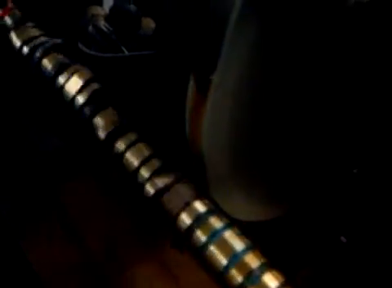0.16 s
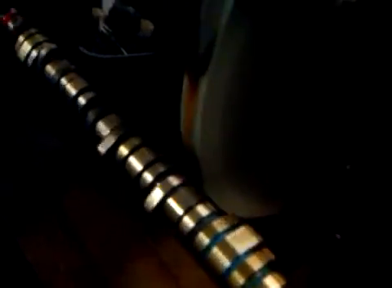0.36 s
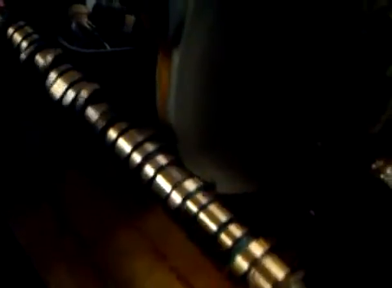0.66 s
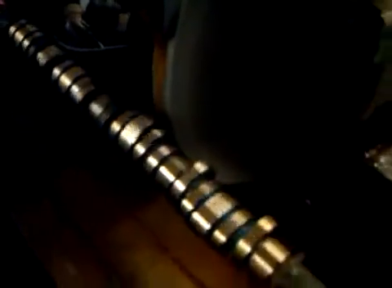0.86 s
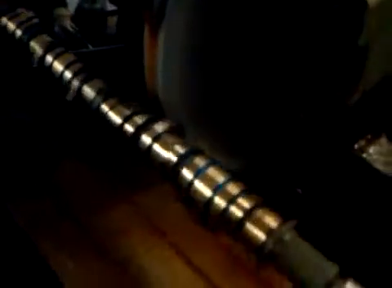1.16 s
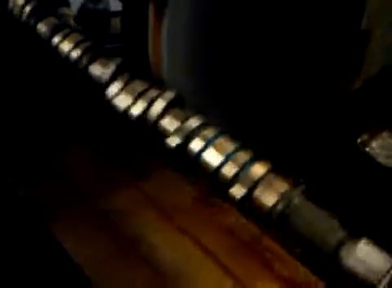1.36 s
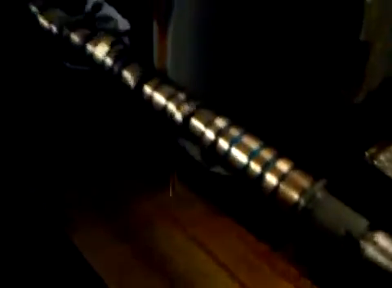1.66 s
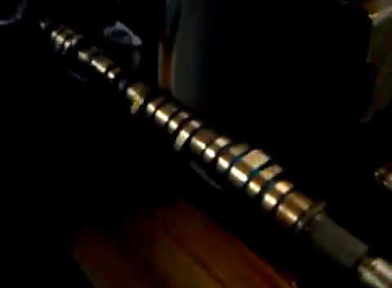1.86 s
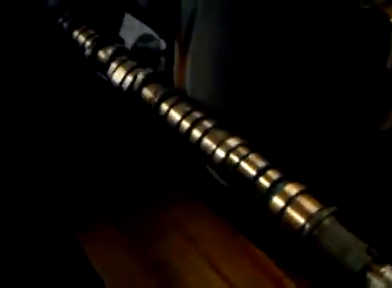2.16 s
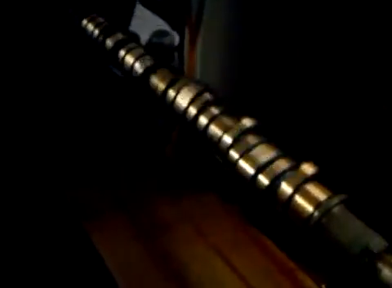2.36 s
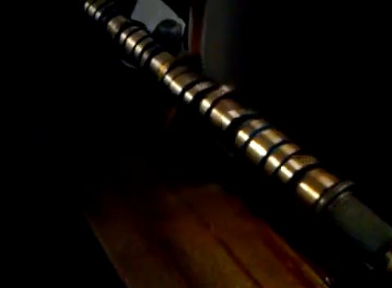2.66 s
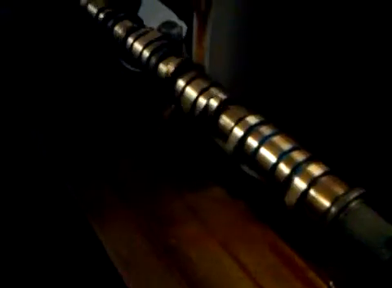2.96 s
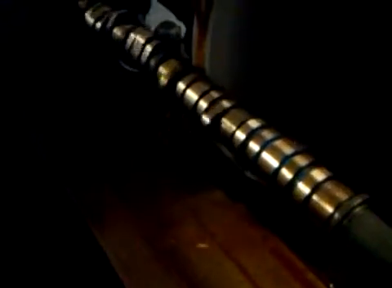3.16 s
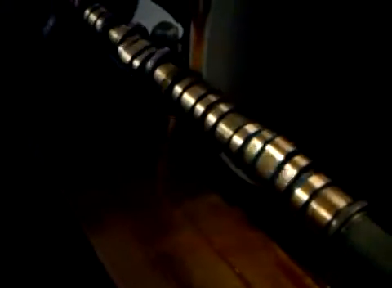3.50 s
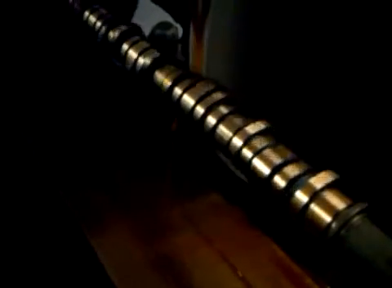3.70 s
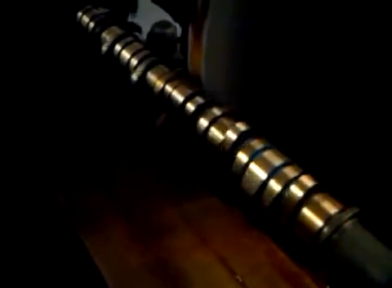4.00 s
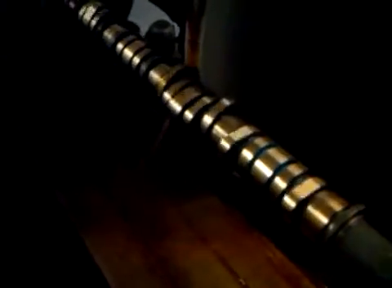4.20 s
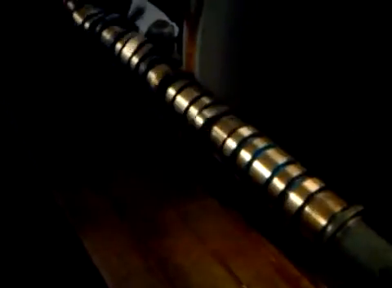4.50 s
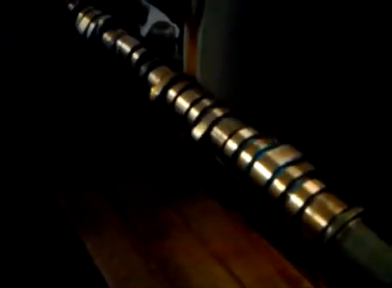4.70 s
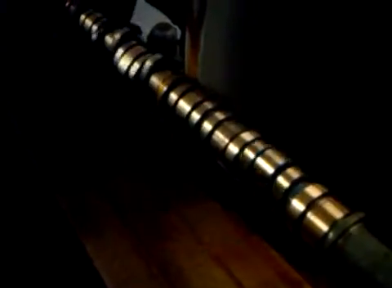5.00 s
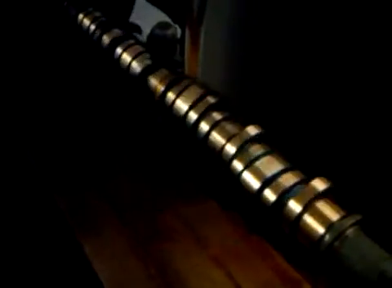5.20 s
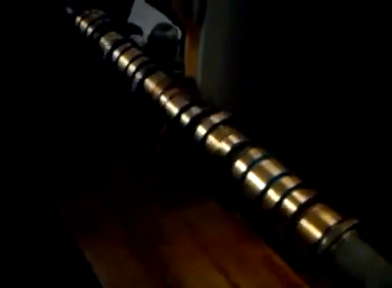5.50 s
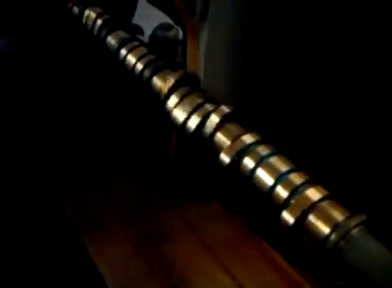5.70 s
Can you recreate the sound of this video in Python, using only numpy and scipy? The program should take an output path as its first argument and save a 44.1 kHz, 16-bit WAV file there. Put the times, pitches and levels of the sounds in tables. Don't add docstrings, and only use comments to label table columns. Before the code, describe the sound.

Machine-shop grinder idles with hum, gear whine and coolant hiss, then bites metal lobes in harsh buzzing bursts, one short, one long.

```python
import sys
import numpy as np
from scipy import signal
from scipy.fft import rfft, irfft, next_fast_len
from scipy.io import wavfile
from scipy.ndimage import uniform_filter1d, map_coordinates

SR = 44100
rng = np.random.default_rng(int(sys.argv[2]) if len(sys.argv) > 2 else 0)


def gain_from_decibels(decibels):
    exponent = np.asarray(decibels, float) / 20
    return 10 ** exponent


def bounce(signal):
    frames = np.transpose(np.atleast_2d(signal))
    limited = np.clip(frames, -1, 1)
    pcm = np.round(limited * 32767).astype(np.int16)
    wavfile.write(sys.argv[1], SR, pcm)


N = 257984
T = np.arange(N) / SR


def unit(x):
    return x / np.sqrt(np.mean(x ** 2) + 1e-20)


def along(points, hz):
    f, v = np.transpose(points)
    return np.interp(np.log(hz + 1), np.log(f + 1), v)


def curves(table):
    s, *cols = np.transpose(table)
    return [np.interp(T, s, c) for c in cols]


def wobble(rate_hz):
    coarse = T[::16]
    knots = rng.standard_normal(int(N * rate_hz / SR) + 4)
    return np.interp(T, coarse, map_coordinates(knots, [coarse * rate_hz]))


def filtered(x, response):
    m = next_fast_len(N + SR // 2)
    return irfft(rfft(x, m) * response(np.fft.rfftfreq(m, 1 / SR)), m)[:N]


def modes(table):
    def response(f):
        total = 0
        for k, (hz, width_hz, db) in enumerate(table):
            damping = 1j * f * width_hz
            total = total + (-1) ** k * gain_from_decibels(db) * damping / (hz * hz - f * f + damping)
        return total
    return response


def smooth_field(shape, bins, frames):
    return unit(uniform_filter1d(uniform_filter1d(rng.standard_normal(shape), bins, 0), frames, 1))


def rush(spectrum, patchy_db):
    z = signal.stft(rng.standard_normal(N), nperseg=512)[2]
    patches = gain_from_decibels(patchy_db * smooth_field(z.shape, 6, 12))
    x = signal.istft(z * patches, nperseg=512)[1][:N]
    return unit(filtered(x, lambda hz: gain_from_decibels(along(spectrum, hz))))


def tone(hz, db, wander_db):
    phase = 2 * np.pi * hz * T + 6 * rng.random() + .3 * wobble(5)
    return gain_from_decibels(db + 3 + wander_db * wobble(6)) * np.sin(phase)


def bursts(rows, attack_s):
    out, t = np.zeros(N + SR), T[:SR // 3]
    for s, db, t60 in rows:
        shape = gain_from_decibels(db - 60 * t / t60) * (1 - np.exp(-t / attack_s))
        out[round(s * SR):][:len(t)] += shape * rng.standard_normal(len(t))
    return out[:N]


# (time [s], 64th wheel order [Hz])
WHEEL_SPEED = [(1.95, 1525), (2.35, 1524), (4.6, 1522), (5.166, 1517), (5.3, 1519)]
# (order [per turn], level [dB])
GRIT_ORDERS = [(30, 12), (34, 7.5), (37, 6.5), (40, 14), (42, 1.5), (48, 9.5), (52, 9), (54, 0), (60, -25),
               (62, 5), (64, 13)]
# (order [per turn], depth [dB], phase [turns])
WHEEL_RUNOUT = [(2, .4, .6), (4, .6, .1), (5, .6, .7), (6, .6, .4), (10, .6, .2)]
# (time [s], depth [dB], phase [turns])
TURN_BEAT = [(1.85, 3.5, 0), (2.45, 3.5, 0), (4.3, 1.5, .38), (5.85, 1.3, .38)]
# (frequency [Hz], density [dB per Hz])
RING_SPECTRUM = [(560, -46), (640, -13), (720, -9.5), (850, -2.5), (1000, -6), (1190, -8), (1280, 3.5),
                 (1340, -4), (1430, 1.5), (1540, -4), (1580, -27.5), (1750, -31.5)]
# (frequency [Hz], density [dB per Hz])
RASP_SPECTRUM = [(2380, -32.5), (4050, -16), (4240, -2), (4610, -9), (4920, -1.5), (6290, -3), (7250, -3),
                 (9420, -32.5), (16000, -120)]
# (frequency [Hz], density [dB per Hz])
SCRAPE_SPECTRUM = [(970, -45), (1650, -12.5), (1770, -18.5), (1900, -2), (2190, 0.5), (2450, -1),
                   (2790, -3.5), (3890, -0.5), (3950, -4.5), (5140, -45), (8690, -120)]
FULL_DB = -38
RING_DB, SCRAPE_DB = -6, -14.5
RING_GROWS, SCRAPE_GROWS = 0.73, 0.49


def grinding():
    press, flying = contact()
    order64_hz = uniform_filter1d(curves(WHEEL_SPEED)[0], SR // 8)
    turns = np.cumsum(order64_hz / 64 / SR)
    tracks = np.array([wobble(4.5) for _ in range(4)])
    drifting = sum(share * grit(turns) for share in tracks / np.linalg.norm(tracks, axis=0))
    steady = grit(turns, GRIT_ORDERS)
    chips = rng.standard_normal((2, N))
    runout_db = sum(db * np.cos(2 * np.pi * (order * turns + phase)) for order, db, phase in WHEEL_RUNOUT)
    depth_db, phase = curves(TURN_BEAT)
    beat_db = depth_db * np.cos(2 * np.pi * (turns + phase))

    shaking = .7 * steady + .5 * drifting + .55 * chips[0]
    ring = through_guard(shaking, RING_SPECTRUM, base=0.69, peaky=0.89, uneven_db=2.0)
    cutting = .45 * steady + .8 * drifting + .6 * chips[1]
    cutting = cutting * gain_from_decibels(1.1 * wobble(500))
    rasp = through_guard(cutting, RASP_SPECTRUM, base=0.41, peaky=0.81, uneven_db=3.0)
    scrape = through_guard(cutting, SCRAPE_SPECTRUM, base=0.17, peaky=0.96, uneven_db=7.0)

    bright = (press + flying) * rasp + gain_from_decibels(SCRAPE_DB) * press ** SCRAPE_GROWS * scrape
    bright = bright * gain_from_decibels(.8 * runout_db + .25 * beat_db + .6 * wobble(12))
    ring_db = RING_DB + .5 * runout_db + beat_db + 0.79 * wobble(13)
    return gain_from_decibels(FULL_DB) * (bright + press ** RING_GROWS * ring * gain_from_decibels(ring_db))


# (touch [s], ease [s], leave [s], first-bite share of pressure, build-up [s])
LOBE_PASSES = [
    (1.858, 2.332, 2.455, 0.31, 0.21),
    (4.351, 4.39, 4.41, 0.29, 0.19),
    (4.407, 5.325, 5.372, 0.066, 0.084),
    (5.765, 5.95, 9.6, .05, 0.048),
]
TOUCH_S, EASE_BEND = 0.0088, 0.78
CHIPS_DB, CHIPS_S, CHIPS_FADE_DB = -15, 0.065, -1.5


def contact():
    touch, ease, leave, bite, build = np.transpose(LOBE_PASSES)[..., None]
    ramp = lambda s, length_s: np.clip(s / length_s, 0, 1)
    press = ramp(T - touch, TOUCH_S) * (1 - (1 - bite) * np.exp(-np.abs(T - touch) / build))
    lift = ramp(T - ease, leave - ease)
    chips = gain_from_decibels(CHIPS_DB + CHIPS_FADE_DB * ramp(T - leave, CHIPS_S))
    chips = chips * lift * ramp(leave + CHIPS_S - T, TOUCH_S)
    return np.max(press * (1 - lift ** EASE_BEND), 0), np.sum(press * chips, 0)


def grit(turns, strong=(), size=4096):
    top_order = 340
    gain = np.ones(size // 2 + 1)
    for order, db in strong:
        gain[round(order)] = gain_from_decibels(db)
    gain[top_order:] = 0
    face = irfft(gain * np.exp(2j * np.pi * rng.random(len(gain))), size)
    face = face * size / np.sqrt(2 * top_order)
    return map_coordinates(face, [turns % 1 * size], mode="grid-wrap")


# (time [s], place [0 near end, 1 flank, 2 nose])
CONTACT_PLACE = [(2.5, 0), (4.3, 1), (4.7, 1), (4.95, 2), (5.5, 2), (5.7, 1)]
# (frequency [Hz], width [Hz], level [dB])
NEAR_END_MODES = [(930, 30, -2), (1290, 44, 0.5), (1506, 39, 1.5), (1910, 100, -12.5), (2105, 49, -16),
                  (2280, 37, -18), (3860, 150, -24), (4460, 92, -16), (5180, 110, -10), (5600, 58, 4.5),
                  (5680, 160, -4), (6240, 90, 0), (6460, 70, 0.5), (6740, 43, -1.5)]
# (frequency [Hz], width [Hz], level [dB])
FLANK_MODES = [(960, 45, -3), (1260, 38, -8.5), (1520, 33, -25), (2240, 120, -9), (3290, 150, -19.5),
               (3900, 160, -12), (4340, 38, -2.5), (4910, 54, -3), (5300, 41, -4.5), (5610, 54, -4),
               (6000, 110, 1.5), (6300, 59, 3.5), (6710, 36, 2.5), (6700, 42, -18)]
# (frequency [Hz], width [Hz], level [dB])
NOSE_MODES = [(972, 30, 4.5), (1280, 54, -8), (1530, 25, 5.5), (2460, 45, -15.5), (3770, 120, -16),
              (4210, 200, -6.5), (4890, 40, -5), (4940, 48, 0.5), (5320, 40, -9), (5630, 50, -4.5),
              (6060, 140, -3.5), (6450, 57, -6.5), (6690, 57, -6), (6620, 68, 1.5)]


def through_guard(source, spectrum, base, peaky, uneven_db):
    place = curves(CONTACT_PLACE)[0]
    grid_hz = np.arange(400, 9000, 4.)
    knots_hz = grid_hz[::10]
    out = np.zeros(N)
    for k, table in enumerate([NEAR_END_MODES, FLANK_MODES, NOSE_MODES]):
        dips = np.clip(rng.standard_normal(len(knots_hz)), -2, .8)
        small = np.interp(grid_hz, knots_hz, dips)
        gain = gain_from_decibels(along(spectrum, grid_hz) + uneven_db * small)
        gain = gain * (base + peaky * np.abs(modes(table)(grid_hz)))
        coloured = filtered(source, lambda hz: np.interp(hz, grid_hz, gain, 0, 0))
        out += np.clip(1 - np.abs(place - k), 0, 1) ** 1.07 * unit(coloured)
    return out


# (time [s], peak level [dB])
TABLE_THUMPS = [(0.869, -45), (1.397, -47.5), (1.522, -36.5), (1.581, -37), (1.626, -45), (1.877, -47),
                (2.217, -49), (2.253, -38), (2.459, -33.5), (2.481, -26), (2.495, -27.5), (2.509, -29),
                (2.55, -39), (2.891, -35), (2.93, -41), (4.368, -37), (4.386, -46), (5.807, -40)]
# (frequency [Hz], width [Hz], level [dB])
TABLE_MODES = [(227, 150, -7), (324, 50, 2.5), (394, 82, 1), (485, 144, -5.5)]
# (time [s], level [dB], t60 [s])
STOP_CRACKS = [
    (2.4775, -22.5, 0.037),
    (2.486, -33.5, .04),
    (2.498, -30.5, 0.053),
    (2.509, -31, 0.041),
    (2.89, -50, 0.15),
    (2.94, -52, 0.15),
    (4.381, -34, 0.062),
]
# (frequency [Hz], width [Hz], level [dB])
STOP_MODES = [(860, 400, -4.5), (1810, 180, 9), (2990, 200, -12)]
# (time [s], level [dB], t60 [s])
TOOL_CLANK = [
    (1.065, -26.5, 0.036),
    (1.088, -41, 0.14),
    (1.115, -44, .12),
    (1.139, -46, .15),
]
# (frequency [Hz], width [Hz], level [dB])
TOOL_MODES = [(1640, 190, -0.5), (1777, 180, 0.5), (1900, 240, -1.5), (2600, 270, -11), (3460, 340, -12)]
# (time [s], level [dB], t60 [s])
CHIP_TICKS = [
    (.468, -44, 0.044),
    (.59, -50, 0.027),
    (1.588, -39, 0.042),
]


def knocks():
    pushes = np.zeros(N)
    for s, db in TABLE_THUMPS:
        pushes[round((s - .005) * SR)] = gain_from_decibels(db + 39)
    thud = filtered(pushes, lambda hz: modes(TABLE_MODES)(hz) ** 2)

    def stop(hz):
        band = 1j * hz / (350 + 1j * hz) / (1 + 1j * hz / 3000)
        return band * (0.79 + modes(STOP_MODES)(hz))

    crack = filtered(bursts(STOP_CRACKS, attack_s=0.00092), stop)
    clank = filtered(bursts(TOOL_CLANK, attack_s=0.00059), lambda hz: modes(TOOL_MODES)(hz) ** 2)
    tick = filtered(bursts(CHIP_TICKS, attack_s=0.0006), modes([(4820, 2400, 0)]))
    return thud + crack + gain_from_decibels(13.5) * clank + tick


# (frequency [Hz], t60 [s])
ROOM_T60 = [(200, 0.22), (1500, 0.21), (6000, 0.069)]


def room(x):
    hz, t, z = signal.stft(rng.standard_normal(SR // 2), SR, nperseg=256)
    decay = gain_from_decibels(-60 * t / along(ROOM_T60, hz)[:, None])
    tail = signal.istft(z * decay, SR, nperseg=256)[1]
    delayed = np.pad(x, (400, 0))
    return signal.fftconvolve(delayed, tail / np.linalg.norm(tail))[:N]


# (frequency [Hz], width [Hz], level [dB rms])
SPINDLE_BANDS = [(1420, 53, -71), (2070, 140, -81), (118, 70, -68.5), (2830, 200, -75), (4290, 220, -72.5)]


def spindle():
    out = np.zeros(N)
    for hz, width_hz, db in SPINDLE_BANDS:
        response = modes([(hz, width_hz, 0)])
        out += gain_from_decibels(db) * unit(filtered(rng.standard_normal(N), lambda f: response(f) ** 2))
    return out


# (time [s], hum level [dB])
HUM_LEVEL = [(0.0, -66.5), (1.07, -62.5), (1.46, -59), (2.3, -62.5), (2.95, -59), (3.16, -57.5),
             (3.44, -63.5), (4.4, -65), (4.87, -63), (5.05, -71), (5.85, -60)]
# (frequency [Hz], level [dB re hum])
HUM_LINES = [(34.4, -13), (103.3, -6), (120, -3.5), (137.7, -2.5)]
# (frequency [Hz], level [dB rms])
GEAR_WHINE = (645.65, -56)
# (frequency [Hz], level [dB rms])
MOTOR_LINES = [(206.6, -77), (211.5, -73), (240.1, -80), (360, -78), (619.6, -79), (664.55, -69),
               (702, -78), (826.3, -75), (846, -77), (1106.5, -82), (1401.5, -78), (1422.5, -78),
               (1425, -75), (2116, -80), (2821, -81), (4226, -81)]
# (time [s], level [dB])
SPRAY_LEVEL = [(0.0, -61.5), (1.178, -64), (2.58, -62), (3.398, -58.5), (3.714, -58), (4.05, -62.5),
               (4.3, -60.5), (5.74, -62)]
# (frequency [Hz], density [dB per Hz])
SPRAY_SPECTRUM = [(1760, -43), (3000, -9.5), (3990, -4.5), (4260, -3.5), (4760, -2.5), (6210, 0.5),
                  (6880, 0), (7250, -5.5), (9420, -36.5), (16000, -120)]
# (frequency [Hz], density [dB per Hz])
AIR_SPECTRUM = [(88, -36.5), (150, -11.5), (173, -11), (352, -12.5), (572, -13), (605, -16), (640, -8.5),
                (760, -14.5), (839, -13), (1320, -16.5), (1420, -30.5), (1530, -18.5), (2270, -21.5),
                (4500, -28.5), (5850, -60.5), (9900, -120)]
# (frequency [Hz], density [dB per Hz])
RUMBLE_SPECTRUM = [(18, -30.5), (32, -4.5), (60, -4.5), (90, -3.5), (130, -38)]
RUMBLE_DB, RUMBLE_FOLLOWS, DAMPED_DB = -75.5, .2, -5


def shop():
    hum_db = curves(HUM_LEVEL)[0]
    lines = tone(*GEAR_WHINE, wander_db=0.6) + sum(tone(hz, db, wander_db=2) for hz, db in MOTOR_LINES)
    hum = gain_from_decibels(hum_db - 1.6) * sum(tone(hz, db, wander_db=3.5) for hz, db in HUM_LINES)
    spray_db = curves(SPRAY_LEVEL)[0] + 1.0 + 0.62 * wobble(4.9) + 1.2 * wobble(27)
    spray = gain_from_decibels(spray_db) * rush(SPRAY_SPECTRUM, patchy_db=1.5)
    air = gain_from_decibels(-60 + 2.0 * wobble(2.5)) * rush(AIR_SPECTRUM, patchy_db=1.5)
    rumble_db = RUMBLE_DB + RUMBLE_FOLLOWS * (hum_db - hum_db.mean()) + DAMPED_DB * contact()[0]
    rumble = gain_from_decibels(rumble_db + 2.0) * rush(RUMBLE_SPECTRUM, patchy_db=0.5)
    return lines + spindle() + hum + spray + air + rumble


def scene():
    hits = knocks()
    return (grinding() + hits + gain_from_decibels(-8) * room(hits) + shop())[None]


CAMERA_RATE_HZ = 16000
FRAME_S, FIRST_S = 1024 / CAMERA_RATE_HZ, 1.0865
UPSET_FRAMES = [0, 8, 13, 21, 22, 23, 29, 51, 52, 53, 67, 70, 74]


def dropouts(x, depth_db=-24, mask_db=-11):
    hz, t, z = signal.stft(x, SR, nperseg=256, noverlap=192)
    power = uniform_filter1d(uniform_filter1d(np.abs(z) ** 2, size=3, axis=0), size=6, axis=1)
    level = np.sqrt(power)
    chance = smooth_field(z.shape, 3, 16)
    gain = np.ones(z.shape)
    for k in UPSET_FRAMES:
        inside = np.abs(t - FIRST_S - (k - .45) * FRAME_S) < FRAME_S / 2
        quiet = level[:, inside] < gain_from_decibels(mask_db) * level[:, inside].max(1, keepdims=True)
        lost = quiet & (chance[:, inside] > .2) & (hz > 1200)[:, None]
        gain[:, inside] = np.where(lost, gain_from_decibels(depth_db), 1)
    return signal.istft(z * gain, SR, nperseg=256, noverlap=192)[1][:N]


BLIP_LEVELS = [-75, -65, -49, -61, -58, -68, -64, -66, -64, -63, -60, -66, -55]


def blips():
    envelope = np.zeros(N)
    for k, db in zip(UPSET_FRAMES, BLIP_LEVELS):
        from_peak = np.clip((T - FIRST_S - k * FRAME_S) / .0065, -1, 1)
        envelope += gain_from_decibels(db - 2) * np.cos(np.pi / 2 * from_peak) ** 2
    return envelope * np.sin(np.pi * CAMERA_RATE_HZ * T)


def roll_off(x):
    return signal.sosfilt(signal.butter(12, 9200, fs=SR, output="sos"), x)


def record(dry):
    edge = lambda hz, at_hz, width_hz: np.clip((at_hz - hz) / width_hz, 0, 1)

    def band(hz):
        notch = 1 - .97 * edge(np.abs(hz - CAMERA_RATE_HZ / 4), 50, 20)
        return edge(hz, 7300, 60) ** 3 * notch

    x = filtered(dropouts(dry[0]), band)
    folded = x * np.cos(2 * np.pi * CAMERA_RATE_HZ * T)
    mirror = filtered(folded, lambda hz: edge(hz, 9250, 350) * (hz > CAMERA_RATE_HZ / 2))
    mix = x + gain_from_decibels(-24.5) * mirror + blips()
    return roll_off(mix[None])


dry = scene()
out = record(dry)
bounce(out)
```